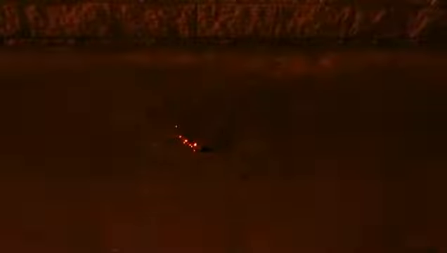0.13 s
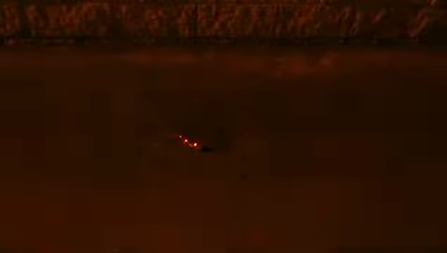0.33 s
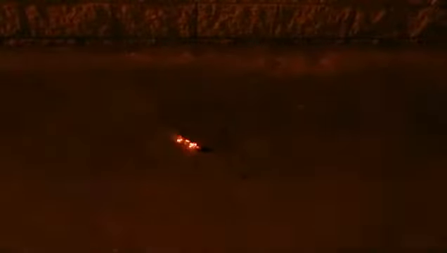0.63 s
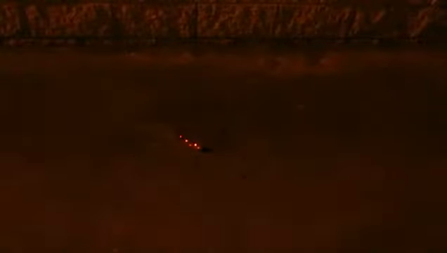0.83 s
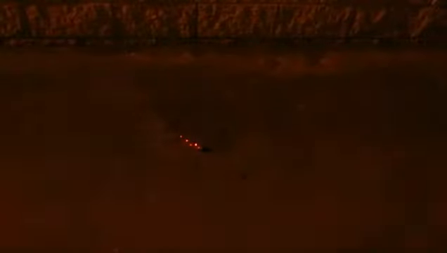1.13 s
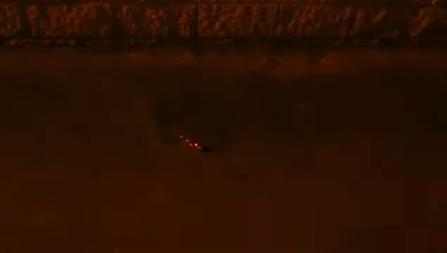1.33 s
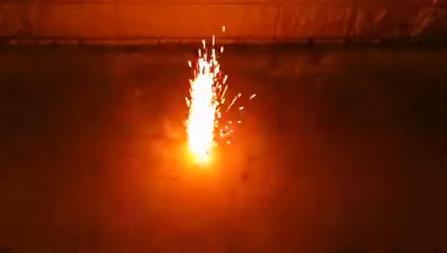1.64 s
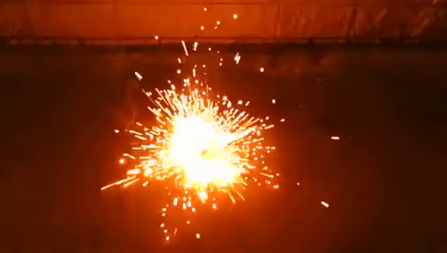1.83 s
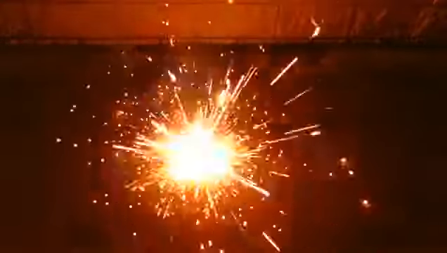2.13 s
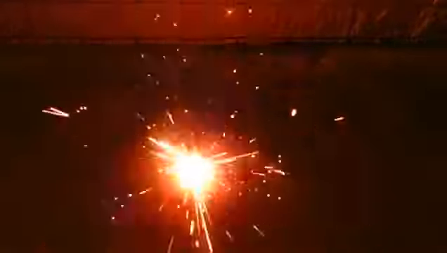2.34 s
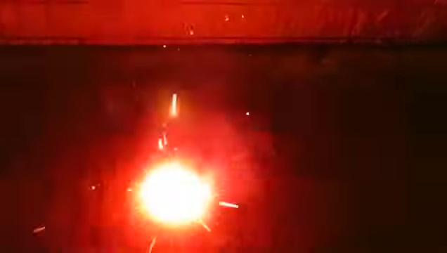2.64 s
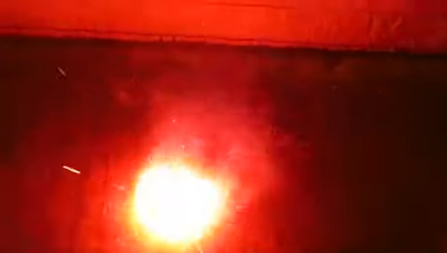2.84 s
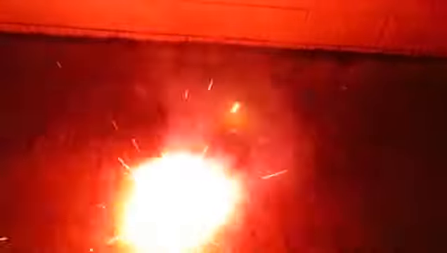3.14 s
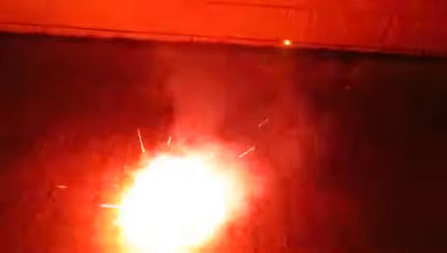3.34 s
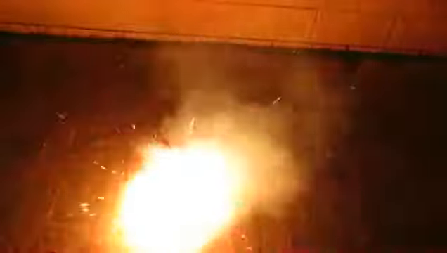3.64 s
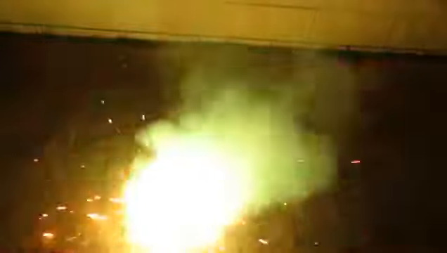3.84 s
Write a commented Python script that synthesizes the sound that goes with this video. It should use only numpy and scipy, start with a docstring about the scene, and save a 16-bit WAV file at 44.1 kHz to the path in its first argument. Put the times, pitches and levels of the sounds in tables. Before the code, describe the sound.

A ground spinner firework: quiet thin fuse fizz, dull knocks and a small pop, then a sudden loud hissing roar with pops and a whirr that rises and falls, close-miked on paving beside a wall at night.

```python
"""A thin fizz and a dull knock open the scene: a ground spinner firework on paving near a wall, at night.
The fuse pops once, then the charge catches: a jet of filtered noise hisses and roars in sputtering surges.
It spins the tube up to a humming whirr, a near sine at the turning rate, which sinks as the thrust eases.
The hiss throbs with every turn of the nozzle; pops are noise bursts rung through the tube's resonances.
Nearby walls send short echoes of the jet and the pops; soft noise makes the night air underneath."""
import sys
import numpy as np
from scipy import signal
from scipy.fft import rfft, irfft
from scipy.io import wavfile
from scipy.ndimage import uniform_filter1d

SR = 44100
rng = np.random.default_rng(int(sys.argv[2]) if len(sys.argv) > 2 else 0)


def wrap_up_sound(samples):
    """Save the sound to the file named by the first command line argument, as 16-bit audio."""
    columns = np.atleast_2d(samples).T
    # keep every value between -1 and 1, then stretch to whole-number steps
    tamed = np.clip(columns, -1, 1)
    steps = np.round(tamed * 32767).astype(np.int16)
    wavfile.write(sys.argv[1], SR, steps)


N = 176400
TIME = np.arange(N) / SR
CATCH_S = 1.69  # the charge catches


def from_db(db):
    """Decibels to gain."""
    return 10 ** (np.asarray(db) / 20)


def rms_one(x):
    """Scale to rms 1."""
    return x / np.sqrt(np.mean(x ** 2) + 1e-20)


def in_time(rows):
    """A curve over time, joined by straight lines."""
    times, values = np.transpose(rows)
    return np.interp(TIME, times, values)


def at_hz(points, hz):
    """A spectrum read on a log-frequency axis."""
    point_hz, values = np.transpose(points)
    return np.interp(np.log(hz + 1e-3), np.log(point_hz), values)


def after(moment, length):
    """A ramp from 0 to 1 centred on a moment, both in seconds."""
    return np.clip((TIME - moment) / length + 0.5, 0, 1)


def cut(x, hz, kind, order=2):
    """Butterworth low- or high-pass."""
    return signal.sosfilt(signal.butter(order, hz, kind, fs=SR, output="sos"), x)


def drift(hz):
    """Random wavering up to about a given rate; rms 1."""
    wavering = cut(rng.standard_normal(N + SR), hz, "low")
    return rms_one(wavering[SR:])  # the filter has settled by now


def noise(colour, likeness):
    """Stereo noise with a given colour and left-right likeness; its mono mix has rms 1."""
    hz = np.arange(N // 2 + 1) * SR / N
    mid, side = rfft(rng.standard_normal((2, N)))
    alike = np.clip(at_hz(likeness, hz), -0.999, 0.999)  # keeps the ratio below finite
    side = side * np.sqrt((1 - alike) / (1 + alike))
    spectra = from_db(at_hz(colour, hz)) * np.array([mid + side, mid - side])
    left_right = irfft(spectra, N)
    return left_right / np.std(left_right.mean(axis=0))


def burst(start, length):
    """Noise that starts at once and dies away exponentially, with its decay time in seconds."""
    decay = np.exp(-np.abs(TIME - start) / length)
    return (TIME > start) * decay * rng.standard_normal(N)


# Colour of the night air: pitch_hz [Hz], density_db [dB per Hz, relative]
NIGHT_COLOUR = [(18, -45), (30, -22), (102, -7), (177, -8.5), (292, -9), (359, -9.5), (591, -12.5),
                (709, -11.5), (852, -13), (2760, -15.5), (7080, -22), (12600, -28.5), (15500, -34)]
# Left-right likeness of the night air: pitch_hz [Hz], coherence [-1 to 1]
NIGHT_LIKENESS = [(60, 0.54), (130, 0.2), (300, -0.57), (700, -0.29), (2000, 0.65), (15000, -0.0059)]
NIGHT_DB = -48.5


def night_air():
    """Steady, wide noise, strongest in the lows, as the quiet outdoor background."""
    return from_db(NIGHT_DB) * noise(NIGHT_COLOUR, NIGHT_LIKENESS)


# Reflections from nearby walls: delay_s [s], level_db [dB, before the trim for each source]
WALL_ECHOES = [(.0034, -9.5), (.0087, -8.5), (.012, -23.5)]
WANDER_S, WANDER_HZ = 0.00012, 1.5  # rms shift of each delay, and how fast it slides


def walls(sound, trim_db=0):
    """Add short delayed copies, whose delays slide as the tube wanders."""
    out = sound.copy()
    for delay_s, level_db in WALL_ECHOES:
        sent = TIME - delay_s - WANDER_S * drift(WANDER_HZ)
        index = np.clip(np.round(sent * SR).astype(int), 0, N - 1)
        out += from_db(level_db + trim_db) * sound[..., index]
    return out


# Soft dull knocks before the charge catches: start_s [s], peak_db [dB], centre_hz [Hz]
KNOCKS = [(0.15, -34, 750), (0.726, -40.5, 447), (1.188, -38, 330)]
KNOCK_DECAY_S, KNOCK_WIDTH = 0.018, 2.2  # width: ratio of each band edge to the centre


def knocks():
    """Brief, dull thuds: decaying noise bursts held to a band around each centre."""
    out = 0
    for start_s, peak_db, centre_hz in KNOCKS:
        thud = cut(burst(start_s, KNOCK_DECAY_S), centre_hz * KNOCK_WIDTH, "low")
        thud = cut(thud, centre_hz / KNOCK_WIDTH, "high")
        out = out + from_db(peak_db) * thud / np.abs(thud).max()
    return out


# Left-right likeness of the jet, shared by the fuse: pitch_hz [Hz], coherence [-1 to 1]
JET_LIKENESS = [(100, 1), (600, 0.99), (1200, 1), (2000, 1), (3600, 1), (5000, 0.94), (6000, 0.83),
                (12000, 0.62)]
# Swells of the fizz: time_s [s], level_db [dB, before the trim]
FUSE_LEVEL = [(.2, -52.5), (.45, -54), (.65, -56), (1.05, -51), (1.15, -56), (1.65, -65)]
# Colour of the fizz: pitch_hz [Hz], density_db [dB per Hz, relative]
FUSE_COLOUR = [(3000, -5), (7000, -8), (12000, -1.5), (15500, -10)]
FUSE_TRIM_DB, FUSE_ROUGH_DB, FUSE_ROUGH_HZ = -1, 2.5, 500


def fuse():
    """A thin fizz: bright noise made grainy by fast random level changes, until the charge catches."""
    grain = from_db(FUSE_ROUGH_DB * drift(FUSE_ROUGH_HZ))
    fizz = rms_one(noise(FUSE_COLOUR, JET_LIKENESS) * grain)
    burning = 1 - after(CATCH_S, 0.05)
    return fizz * from_db(in_time(FUSE_LEVEL) + FUSE_TRIM_DB) * burning


# Pops of the fuse and spits of the charge:
# start_s [s], strength_db [dB], tail_db [dB, scattered tail relative to the strength]
POPS = [(0.9039, -13.5, -29.5), (1.813, -8.5, -34), (2.531, -14.5, -32), (3.206, -11, -35)]
# Resonances of the tube that ring with each pop: pitch_hz [Hz], level_db [dB], t60_s [s]
TUBE_MODES = [(316, -33, 0.049), (650, -19, 0.024), (1340, -27, 0.014), (1810, -9.5, .01),
              (2610, -2.5, 0.0036), (3550, -12.5, 0.0043), (5060, -8.5, 0.0021)]
POP_CRACK_S, POP_TAIL_S = 0.0013, 0.02  # decay times
POP_LOW_HZ, POP_TOP_HZ, POP_PAN_DB = 267, 6500, 0.5


def pops():
    """A brief tearing of the paper wrap and a scattered tail, rung through the tube and echoed by walls."""
    blows = np.zeros(N)
    for start_s, strength_db, tail_db in POPS:
        crack = burst(start_s, POP_CRACK_S)
        blows += from_db(strength_db) * crack / np.linalg.norm(crack)
        blows += from_db(strength_db + tail_db) * burst(start_s, POP_TAIL_S)
    ringing = 0
    for pitch_hz, level_db, t60_s in TUBE_MODES:
        # two-pole resonator: a sine that decays by 60 dB in t60_s
        radius = from_db(-60 / (t60_s * SR))
        turn = 2 * np.pi * pitch_hz / SR
        poles = [1, -2 * radius * np.cos(turn), radius ** 2]
        ringing = ringing + from_db(level_db) * signal.lfilter([0, np.sin(turn)], poles, blows)
    ringing = cut(cut(ringing, POP_LOW_HZ, "high"), POP_TOP_HZ, "low")
    return walls(ringing * from_db([[POP_PAN_DB / 2], [-POP_PAN_DB / 2]]))


# Rotation of the tube, before smoothing: time_s [s], speed [turns per s]
SPIN = [(1.7, 12), (2.0, 51), (2.12, 100), (2.25, 172), (2.43, 294), (2.53, 350), (2.61, 400), (2.75, 444),
        (2.88, 463), (3.0, 480), (3.05, 480), (3.1, 400), (3.16, 326), (3.22, 270), (3.3, 246), (3.42, 203),
        (3.55, 166), (3.75, 138), (4.0, 125)]


def rotation():
    """Angle of the tube in radians: its smoothed turning speed summed over time."""
    speed = uniform_filter1d(in_time(SPIN), size=1800, mode="nearest")
    return 2 * np.pi * np.cumsum(speed) / SR


# Swells of the whirr: time_s [s], level_db [dB rms, before the trim]
WHIRR_LEVEL = [(2.05, -75), (2.15, -41), (2.26, -34.5), (2.34, -38), (2.376, -43), (2.534, -30),
               (2.838, -32), (2.856, -28.5), (2.976, -41.5), (2.992, -26), (3.024, -28), (3.048, -36.5),
               (3.066, -25.5), (3.096, -23.5), (3.258, -28.5), (3.364, -47), (3.42, -46), (3.6, -44.5),
               (4.0, -46.5)]
# Overtones of the whirr: multiple [of the rotation], level_db [dB rms, before they weaken]
OVERTONES = [(2, -42.5), (3, -47)]
WHIRR_TRIM_DB, WHIRR_PAN_DB = 0.5, 2.5
WHIRR_WAVER_DB, WHIRR_WAVER_HZ = 1.25, 24.5
OVERTONE_WAVER_DB, OVERTONE_WAVER_HZ, OVERTONES_FROM_S = 4, 25, 2.383
# the overtones weaken once the spin collapses: a drop, then a steady fade
OVERTONE_DROP_S, OVERTONE_DROP_DB, OVERTONE_FADE_DB_PER_S = 3.07, -7, 8.5


def whirr(angle):
    """The circling jet pushes the air once a turn: a near sine, with weak, fluttering overtones."""
    waver_db = WHIRR_WAVER_DB * drift(WHIRR_WAVER_HZ)
    tone = np.sin(angle) * from_db(in_time(WHIRR_LEVEL) + WHIRR_TRIM_DB + waver_db)
    drop_db = OVERTONE_DROP_DB * after(OVERTONE_DROP_S, 0.032)
    fade_db = drop_db - OVERTONE_FADE_DB_PER_S * np.maximum(TIME - OVERTONE_DROP_S, 0)
    entry = after(OVERTONES_FROM_S, 0.15)
    for multiple, level_db in OVERTONES:
        flutter_db = OVERTONE_WAVER_DB * drift(OVERTONE_WAVER_HZ)
        tone += entry * from_db(level_db + fade_db + flutter_db) * np.sin(multiple * angle)
    # root two turns peak levels into rms levels
    return np.sqrt(2) * tone * from_db([[WHIRR_PAN_DB / 2], [-WHIRR_PAN_DB / 2]])


SPARKS_PER_S, SPARK_DECAY_S, SPARK_GAIN = 120, 0.00049, 0.44


def sparks():
    """Sub-millisecond flare-ups of burning grains, as a gain on the jet."""
    strength = np.minimum(rng.exponential(1, N), 3)
    born = (rng.random(N) < SPARKS_PER_S / SR) * strength
    flares = signal.lfilter([1], [1, -np.exp(-1 / (SPARK_DECAY_S * SR))], born)
    return 1 + SPARK_GAIN * flares


THROB, DOUBLE_THROB, DOUBLE_FROM_S = 0.1, 0.16, 3.42  # depth of the swing once and twice a turn
# coarse flutter, deeper while the charge throws sparks
SPUTTER_SPARKING_DB, SPUTTER_SPINNING_DB, SPUTTER_HZ = 1.2, 0.4, 44.7


def thrust(angle, spinning):
    """Gain of the gas flow: throbbing as the nozzle sweeps round, flaring and sputtering; rms 1."""
    double = DOUBLE_THROB * after(DOUBLE_FROM_S, 0.26) * np.cos(2 * angle)
    throb = 1 + THROB * np.cos(angle) + double
    depth_db = SPUTTER_SPARKING_DB + (SPUTTER_SPINNING_DB - SPUTTER_SPARKING_DB) * spinning
    return rms_one(throb * sparks() * from_db(depth_db * drift(SPUTTER_HZ)))


# Surges of the flame's lower roar: time_s [s], level_db [dB, before the trim]
ROAR_LEVEL = [(1.675, -72), (1.688, -37.5), (1.75, -31.5), (1.815, -21), (1.84, -31), (1.87, -23),
              (1.91, -28.5), (1.94, -25.5), (2.0, -24), (2.045, -18.5), (2.08, -22.5), (2.23, -23.5),
              (2.27, -33.5), (2.7, -35.5), (2.9, -31.5), (2.97, -35), (3.07, -31.5), (3.17, -31.5),
              (3.26, -28.5), (3.35, -35), (3.68, -36.5), (3.75, -37.5), (4.0, -33)]
# Colour of the roar before and after the spin takes hold: pitch_hz [Hz], density_db [dB per Hz, relative]
ROAR_SPARKING = [(35, -46), (60, -15), (140, -26), (194, -12), (282, -4), (470, -11), (577, -3.5),
                 (961, -5.5), (1080, -8), (1200, -3), (1960, -6), (2170, -3.5), (3500, -5.5), (4550, -17),
                 (7700, -120)]
ROAR_SPINNING = [(60, -48), (130, -14), (200, -0.5), (400, -5.5), (600, -1), (900, -1.5), (1100, -3),
                 (1400, -0.5), (1900, -2.5), (2300, -0.5), (3500, -4.5), (5000, -27)]
ROAR_TRIM_DB, ROAR_ECHO_DB, ROAR_ROUGH_DB = -1.5, -5.5, 2
ROAR_LOW_HZ, ROAR_TOP_HZ = 50, 3560
ROUGH_HZ = 320  # fast roughness of both roar and hiss


def roar(flow, spinning):
    """The lower roar of the flame: noise that changes colour as the spin takes hold, driven by the flow."""
    flame = np.sqrt(1 - spinning) * noise(ROAR_SPARKING, JET_LIKENESS)
    flame = flame + np.sqrt(spinning) * noise(ROAR_SPINNING, JET_LIKENESS)
    flame = flame * flow * from_db(ROAR_ROUGH_DB * drift(ROUGH_HZ))
    flame = cut(flame, ROAR_LOW_HZ, "high")
    flame = cut(flame, ROAR_TOP_HZ, "low", order=4)
    flame = rms_one(walls(flame, ROAR_ECHO_DB))
    return flame * from_db(in_time(ROAR_LEVEL) + ROAR_TRIM_DB)


# Surges of the hiss: time_s [s], level_db [dB, before the stage trims]
HISS_LEVEL = [(1.66, -61), (1.69, -32.5), (1.71, -25.5), (1.76, -21), (1.812, -14.5), (1.825, -21),
              (1.85, -23), (1.876, -14), (1.91, -15), (1.94, -22.5), (2.03, -16.5), (2.25, -17.5),
              (2.265, -21.5), (2.31, -19.5), (2.49, -15.5), (2.64, -21), (2.79, -21.5), (2.89, -20.5),
              (2.935, -16), (2.99, -22.5), (3.11, -18.5), (3.19, -20.5), (3.25, -16), (3.31, -18),
              (3.6, -18.5), (3.7, -23), (3.75, -29), (4.0, -24)]
# Colour of the hiss while it throws sparks, at full thrust, late in the burn and as an ember:
# pitch_hz [Hz], density_db [dB per Hz, relative]
HISS_SPARKING = [(1760, -34), (3000, -4), (4630, -6), (5640, -4.5), (7180, -4.5), (11600, 1), (12900, -1),
                 (15500, -9.5)]
HISS_THRUST = [(1760, -4), (3000, -10.5), (3790, -10), (4500, -12), (6480, -6.5), (9010, -6), (12200, 0.5),
               (12800, -1), (15500, -10.5)]
HISS_LATE = [(1760, -69), (3000, -9.5), (4320, -9.5), (8290, -7.5), (10700, 0.5), (12500, -2.5),
             (15500, -9.5)]
HISS_EMBER = [(1760, -44), (3000, -6.5), (4590, -5.5), (5680, -7), (6750, -3.5), (8350, -6), (10600, 0),
              (15500, -10.5)]
# Level trim of each of the four colours: trim_db [dB]
STAGE_TRIM_DB = [0.98, 0.29, .5, 1.16]
HISS_ECHO_DB, HISS_ROUGH_DB, HISS_BOTTOM_HZ = -2.5, 0.6, 3140


def hiss(flow, begun):
    """Gas rushing from the nozzle: high noise blended through the four stages of the burn."""
    gas = 0
    for stage, colour in enumerate((HISS_SPARKING, HISS_THRUST, HISS_LATE, HISS_EMBER)):
        share = np.sqrt(np.clip(begun[stage] - begun[stage + 1], 0, 1))
        gas = gas + share * from_db(STAGE_TRIM_DB[stage]) * noise(colour, JET_LIKENESS)
    rough = rms_one(from_db(HISS_ROUGH_DB * drift(ROUGH_HZ)))
    gas = walls(gas, HISS_ECHO_DB) * flow * rough
    return cut(gas, HISS_BOTTOM_HZ, "high", order=4) * from_db(in_time(HISS_LEVEL))


# Moments when the burn passes to its next stage: start_s [s]
STAGE_CHANGES_S = [2.26, 2.9, 3.7]
STAGE_BLEND_S = 0.08


def jet(angle):
    """Hiss and roar from the nozzle, sharing one sputtering, throbbing flow."""
    # how far each stage has begun, 0 to 1; the last stage never ends
    begun = [1] + [after(start_s, STAGE_BLEND_S) for start_s in STAGE_CHANGES_S] + [0]
    spinning = begun[1]
    flow = thrust(angle, spinning)
    return hiss(flow, begun) + roar(flow, spinning)


def scene():
    """The firework over the quiet night air."""
    angle = rotation()
    return night_air() + knocks() + fuse() + pops() + whirr(angle) + jet(angle)


CEILING, CUTOFF_HZ = 1, 15800
START_S, FADE_S = 0.13, 0.013


def record(dry):
    """The sound fades in quickly; any peaks over the ceiling are clipped and the top is cut steeply."""
    fade_in = np.clip((TIME - START_S) / FADE_S, 0, 1)
    opened = np.clip(dry, -CEILING, CEILING) * fade_in
    top_cut = signal.ellip(12, 0.1, 80, CUTOFF_HZ, fs=SR, output="sos")
    return signal.sosfilt(top_cut, opened)


dry = scene()
out = record(dry)
wrap_up_sound(out)
```